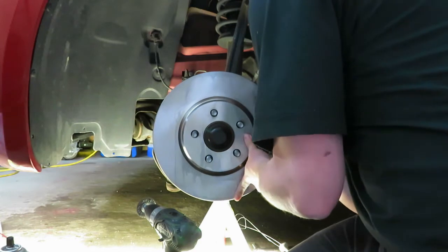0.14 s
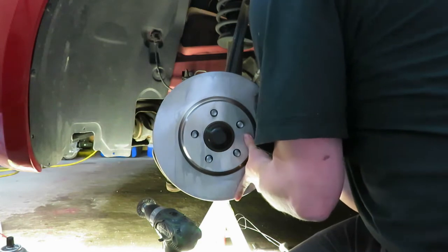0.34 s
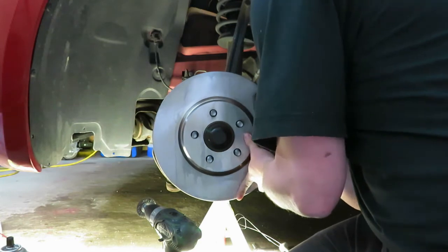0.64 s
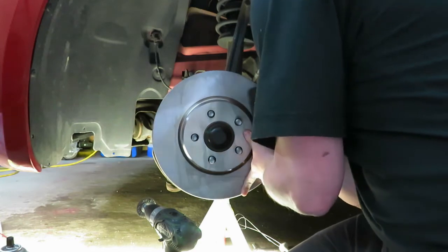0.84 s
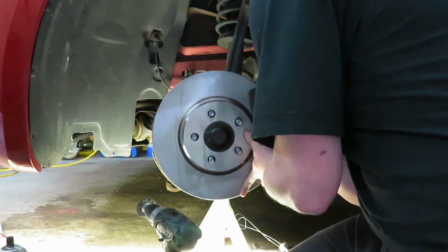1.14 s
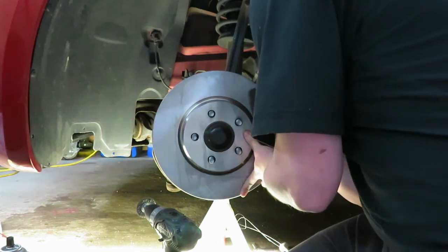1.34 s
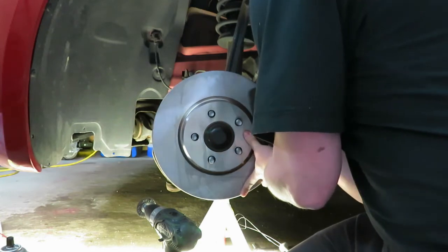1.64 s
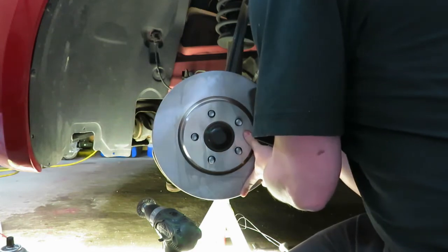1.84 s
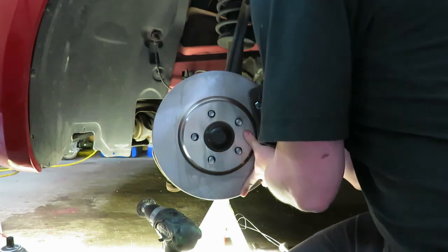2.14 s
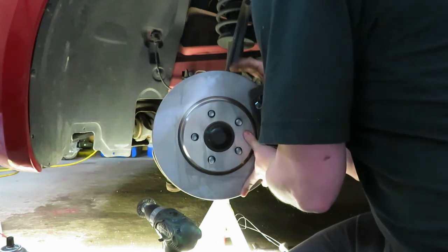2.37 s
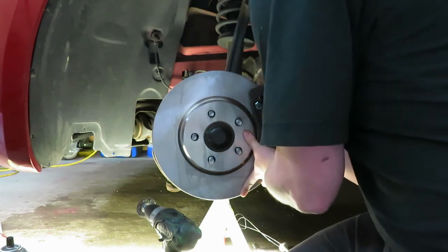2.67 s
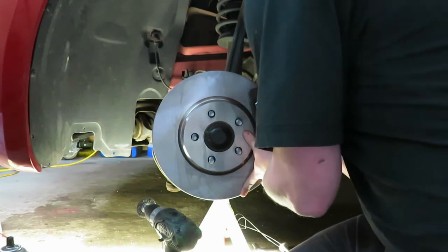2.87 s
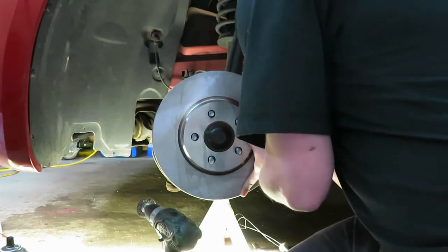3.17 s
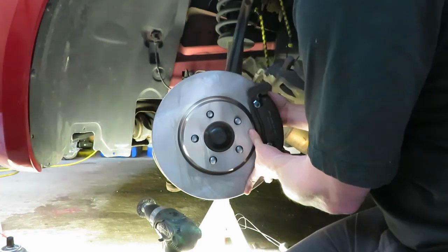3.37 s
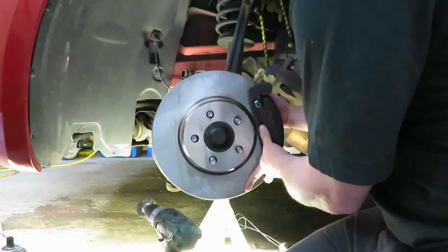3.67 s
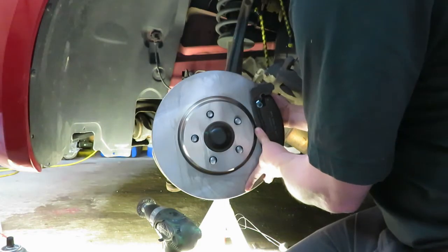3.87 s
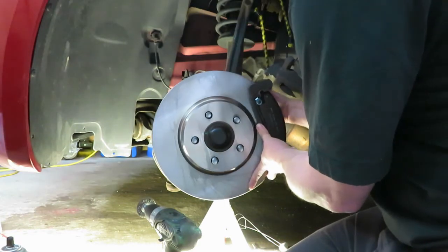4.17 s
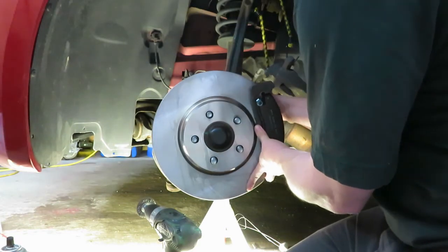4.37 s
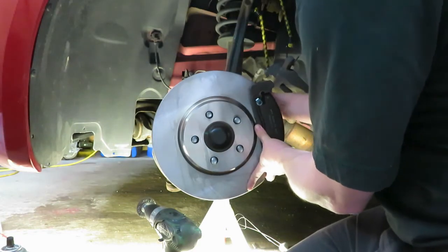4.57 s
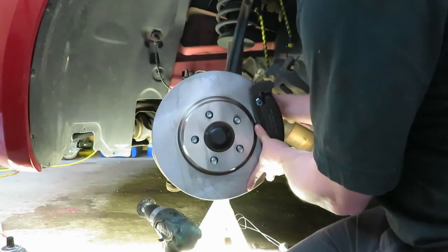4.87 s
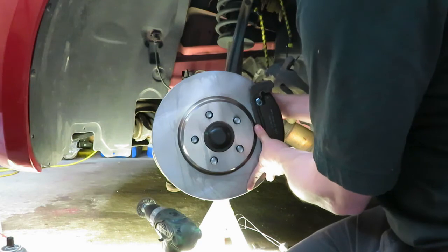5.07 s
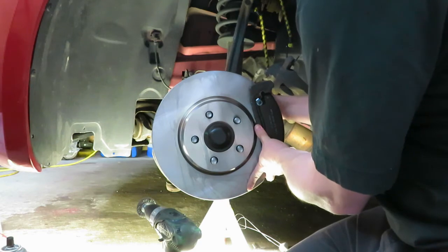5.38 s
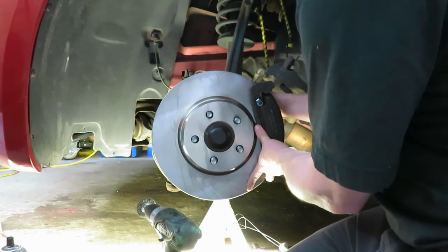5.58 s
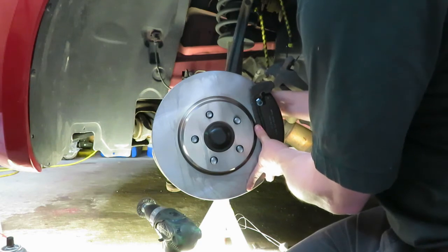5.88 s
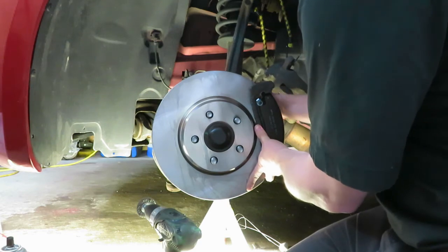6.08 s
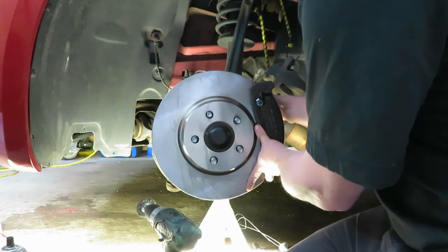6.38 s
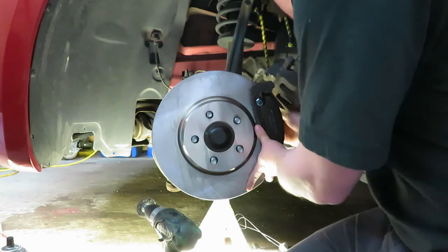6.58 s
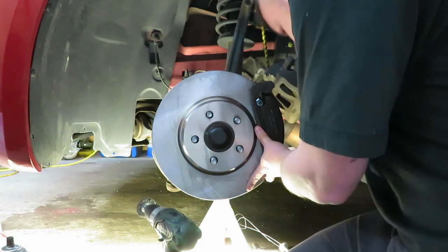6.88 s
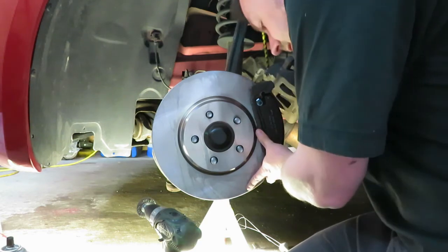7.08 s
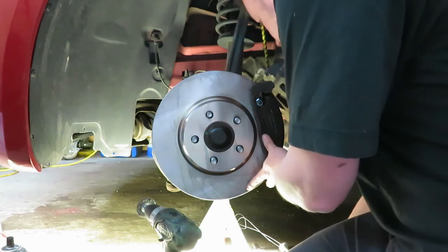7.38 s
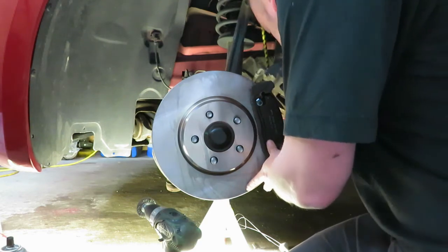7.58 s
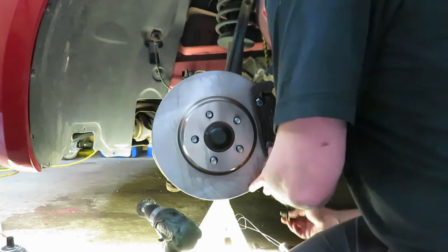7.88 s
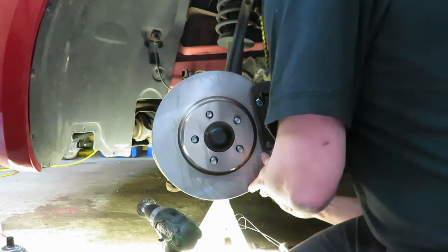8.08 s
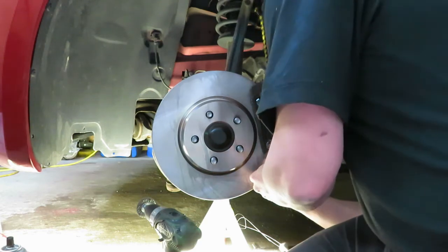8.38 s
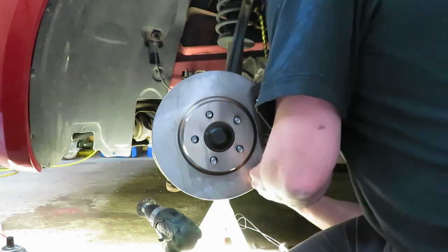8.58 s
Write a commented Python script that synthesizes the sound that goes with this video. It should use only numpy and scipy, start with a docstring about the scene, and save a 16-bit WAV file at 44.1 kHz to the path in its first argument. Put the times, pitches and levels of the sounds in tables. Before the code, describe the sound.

Close, stereo, lightly roomy garage sound: cast iron knocks on a car's hub and disc, with short ringing, heavy low thuds, tiny rattles and gritty scrapes. A distant engine booms in three low revs at first. After a brief gap of near silence, a cluster of clanks and knocks continues over hum, dying to soft touches, thin squeaks and a final rub of the disc.

```python
"""A cast-iron brake caliper bracket is worked into place over a brake disc in a garage.
Its clanks, thuds and rattles are decaying modes and noise bursts; its scrapes are wavering tones with gritty slips.
Shaped noise makes scuffs, thin squeaks, rustle and rumble. A distant engine, revved three times, is a firing
tone and its third order, with a separately wandering drone.
The sound drops out once, briefly, and the engine does not return; narrow noise bands leave a low hum."""
import sys
import numpy as np
from scipy import signal
from scipy.fft import rfft, irfft, next_fast_len
from scipy.io import wavfile
from scipy.ndimage import uniform_filter1d, minimum_filter1d, map_coordinates

SR = 44100
rng = np.random.default_rng(int(sys.argv[2]) if len(sys.argv) > 2 else 0)


def master_out(mix):
    """Clip the mix to full scale and print it as 16-bit PCM to the path in sys.argv[1]."""
    frames = np.transpose(np.atleast_2d(mix))
    ceiling = np.clip(frames, -1, 1)
    pcm = np.round(ceiling * 32767).astype(np.int16)
    wavfile.write(sys.argv[1], SR, pcm)


N = 384552
TIME = np.arange(N) / SR  # seconds into the scene
AGE = np.arange(int(SR * .55)) / SR  # seconds since a contact

# Blows of the bracket on the knuckle. Each row: start in seconds, clank level in dB, hardness as the top
# of the contact's treble in Hz, thud level in dB, mode favoured by the contact point in Hz,
# ring length as a factor (small when gripped), gain of the low clang in dB.
KNUCKLE_BLOWS = [(.001, -34.5, 4670, -68, 1345, 1.17, 5.5), (.185, -48, 2780, -47, 2008, 0.95, 5.5),
                 (.752, -26, 3100, -27.5, 3203, 1.1, 4), (.768, -21.5, 2930, -30.5, 786, 0.63, 6),
                 (.777, -21, 2580, -20.5, 1276, .8, 3.5), (.809, -28, 3200, -29, 2008, .65, 1.5),
                 (.826, -32.5, 2900, -43, 1744, 0.65, 4.5), (.845, -33.5, 3000, -33, 1276, 1, 5),
                 (.867, -34, 2800, -25.5, 895, 1.1, 8), (1.047, -35, 3010, -30.5, 2110, .5, -0.5),
                 (3.771, -51, 2300, -30.5, 895, 0.79, 8.5), (3.8, -43, 2300, -30, 895, .85, 14),
                 (3.878, -39, 2400, -29.5, 2000, 1.1, 6), (3.893, -47.5, 3000, -39.5, 895, .7, 12),
                 (4.046, -33.5, 3750, -35, 2191, .86, 0), (4.078, -34.5, 12000, -45, 2191, .7, -1.5),
                 (4.087, -15, 12000, -30, 1276, 0.9, -4.5), (4.268, -33, 1900, -34, 2000, 1, 13),
                 (4.38, -34, 2790, -43, 2708, 0.94, 4), (4.385, -26.5, 2800, -47, 1943, 0.61, 4),
                 (4.406, -28.5, 3100, -45, 2708, .85, 3.5), (4.413, -26.5, 3200, -44, 2573, 1.2, 2.5),
                 (4.607, -52, 3400, -47, 3203, 0.79, 8.5), (4.735, -54.5, 3400, -46.5, 3203, .8, 5),
                 (4.767, -31, 4480, -53, 2573, 1.6, 2.5), (4.886, -41, 4700, -39.5, 3327, 1, 1),
                 (4.924, -37.5, 3830, -42, 2008, 1.5, 11), (5.145, -22.5, 5200, -48.5, 3171, 1.09, -3),
                 (5.164, -34, 5950, -45, 1335, 1.2, 6.5), (5.422, -47, 2680, -43, 2008, 0.9, 4.5)]
# Blows of the bracket on the disc. Each row: the same columns, in the same units.
DISC_BLOWS = [(1.056, -41.5, 3010, -33, 1696, 1.4, 4.5), (2.149, -19, 3020, -33.5, 1157, 1.11, -1.5),
              (2.158, -29.5, 2800, -43, 818, 1.17, 5.5), (2.287, -48.5, 4400, -51, 2498, .9, -1),
              (2.461, -42.5, 2600, -29, 818, 0.75, 7), (2.521, -45, 2600, -35, 818, 1.06, 13),
              (2.68, -48.5, 3306, -49.5, 2000, 1.1, 3), (6.396, -60, 3680, -41.5, 1992, 0.64, 13.5),
              (6.941, -54, 3000, -42, 2498, 0.79, 14), (6.997, -53, 3000, -50, 2272, .5, 7),
              (7.141, -63, 3200, -47, 2272, .7, 18), (7.35, -53.5, 2800, -45, 1157, 0.73, 8.5),
              (7.555, -53, 2810, -52, 1335, .8, 8.5), (7.634, -64, 3000, -41, 2089, .7, 17)]
# Dense resonances of the iron assembly. Each row: frequency in Hz, relative spectral level in dB.
IRON_SPECTRUM = [(300, -29.5), (650, -8.5), (1000, -1.5), (1300, -7.5), (1550, -9), (1800, -2.5), (2050, 4),
                 (2400, -1.5), (3250, -7), (3650, -11.5), (4200, -30), (5200, -41), (7000, -70)]
# Spectrum of an edge's tick. Each row: frequency in Hz, relative spectral level in dB.
TICK_SPECTRUM = [(2500, -16), (4400, 2), (5300, -5.5), (6300, -6.5), (7300, -3), (8800, -6.5), (10500, -10),
                 (12000, -17.5), (15000, -41.5)]
# High ringing modes of the metal. Each row: frequency in Hz, relative level in dB, unscaled t60 in seconds.
HIGH_RING = [(3980, -3.5, .2), (4260, -2.5, 0.29), (4450, -4, 0.39), (4600, -3.5, 0.23), (4830, -4, 0.25),
             (5515, -8, 0.14), (5911, -5, .17), (6360, -5.5, 0.12), (7400, 1.5, .12), (7466, -1.5, 0.12),
             (7930, 0.5, .12), (8980, -2, .13), (10000, -5.5, .1), (11900, -9.5, .08)]
# The dropout: its start and its end in seconds.
DROPOUT_SPAN = (3.198, 3.372)


def blows(rows, modes, body, ring_db, favour_db):
    """Impact excitation: hardness sets the bandwidth, grip the damping, and weight drives the suspension."""
    # Suspension thud. Each row: frequency in Hz, relative spectral level in dB.
    thud_spectrum = [(70, -31), (140, -9), (280, 6), (450, -3), (700, -15.5), (1500, -44.5), (4000, -91.5)]
    # Suspension modes. Each row: frequency in Hz, relative level in dB, t60 in seconds.
    suspension_modes = [(135, -1, 0.28), (181.2, 2.5, 0.37), (219.6, -0.5, 0.47), (266.2, -2, .35),
                        (298, -6.5, 0.21), (364, -9, 0.38)]
    medium_hz, hardest_hz = 3360, 5200  # ordinary hardness; above hardest_hz only the tick gains
    sharp_db, edge_db = 3, 7  # gain per octave of hardness: upper modes, topmost modes
    snap, snap_s = .55, .01  # extra gain while the parts are pressed together, and its duration
    tick_db = -13.5  # relative to the clank, before the tick's treble roll-off
    thud_attack_s = .005  # the heavy suspension takes a moment to move
    out = np.zeros((2, N))
    for s, clank_db, top_hz, thud_db, favoured_hz, sustain, low_db in rows:
        tones = ring(modes, scatter_db=1.5, favoured_hz=favoured_hz, favour_db=favour_db, sustain=sustain)
        metal = burst(body, t60=.035, room_db=-7, room_t60=.32 * np.sqrt(abs(sustain)))
        metal = metal + amp(ring_db) * tones
        metal = metal * (1 + snap * np.exp(-(AGE / snap_s) ** 2))
        octaves = np.log2(min(top_hz, hardest_hz) / medium_hz)
        brightness = [(2100, 0), (2600, sharp_db * octaves), (3400, edge_db * octaves), (3900, -1.6)]
        metal = unit_attack(colour(metal, brightness))
        metal = colour(metal, [(1300, low_db), (1800, 0)])
        echo = amp(-25.0) * burst(body, t60=.2, room_db=-4.5, room_t60=.35)
        clank = spread(metal, echo) + amp(tick_db) * edge_tick(top_hz, sustain)
        add(out, s, amp(clank_db) * clank)
        thud = burst(thud_spectrum, t60=0.25, room_db=-1.5, room_t60=0.6)
        thud = thud + amp(5.5) * ring(suspension_modes, scatter_db=3.5)
        thud = thud * (1 - np.exp(-AGE / thud_attack_s))
        add(out, s, amp(thud_db) * unit_attack(thud))
    return out


def ring(modes, scatter_db, favoured_hz=0, favour_db=0, sustain=1):
    """Modal superposition: damped sinusoids, one favoured by the contact point, others varying by blow."""
    shift = 1.3  # pitch scatter in Hz for a t60 of 1 s; damped modes shift more
    hz, db, t60 = np.transpose(modes)[:, :, None]
    favour = favour_db * np.exp(-((hz - favoured_hz) / 35) ** 2)
    level = db + scatter_db * rng.standard_normal(hz.shape) + favour
    hz = hz + shift / t60 * rng.standard_normal(hz.shape)
    phase = 2 * np.pi * (hz * AGE + rng.random(hz.shape))
    decay = amp(level - 60 * AGE / (t60 * max(sustain, .1)))
    tones = decay * np.sin(phase.astype(np.float32))
    onset = 1 - np.exp(-(AGE / .0012) ** 2)
    contact = 1 + 0.25 * np.exp(-AGE / 0.048)  # touching parts drain the ring fast at first
    return unit_attack(onset * contact * np.sum(tones, 0))


def burst(spectrum, t60, room_db, room_t60):
    """High modal density: resonances merge into bunched noise, dying fast into the garage's slower decay."""
    cluster_hz, cluster_db = 55.2, 4.5  # spacing and depth of the uneven bunches
    envelope = np.hypot(amp(-60 * AGE / t60), amp(room_db - 60 * AGE / room_t60))
    envelope *= 1 - np.exp(-AGE / 0.0014)  # the contact takes a moment to build
    m = next_fast_len(len(AGE))
    hz = np.fft.rfftfreq(m, 1 / SR)
    knots = rng.standard_normal(size=1000)
    bunches = amp(cluster_db * np.interp(hz / cluster_hz, np.arange(len(knots)), knots))
    noise = irfft(rfft(rng.standard_normal(m)) * bunches, m)[:len(AGE)]
    return unit_attack(wheel_well(colour(envelope * noise, spectrum), gain=0.13))


def wheel_well(x, gain, count=7):
    """Comb filtering: close panels return a few copies within 12 ms."""
    out = x.copy()
    delays = rng.uniform(.001, .012, count)
    signs = rng.choice([-1, 1], count)
    for delay, sign in zip(delays, signs):
        add(out, delay, sign * gain * x)
    return out


def edge_tick(top_hz, sustain):
    """Contact stiffness: an edge snaps and rings briefly, duller and weaker when the contact is softer."""
    crack = amp(1.5) * burst(TICK_SPECTRUM, t60=0.016, room_db=-37.0, room_t60=.1)
    tail = burst(TICK_SPECTRUM, t60=0.035, room_db=-11.5, room_t60=0.22 * abs(sustain))
    tick = crack + tail + amp(-1.0) * ring(HIGH_RING, scatter_db=0.0, sustain=sustain)
    tick = spread(tick, amp(0.5) * burst(TICK_SPECTRUM, t60=.035, room_db=-10.0, room_t60=0.2))
    treble = [(4400, 0.83), (7000, 12.5), (12000, 15), (14000, 11)]
    tilt = [(hz, db + roll_off(hz, top_hz)) for hz, db in treble]
    return amp(tilt[0][1]) * unit_attack(colour(tick, tilt))


def roll_off(hz, top_hz):
    """Low-pass action of a contact: its response in decibels at hz for the given hardness."""
    order = 7.2  # steepness
    return -10 * np.log10(1 + (hz / top_hz) ** (2 * order))


def rattles():
    """Repeated impact: the loose bracket chatters on its seat in tiny, irregularly spaced contacts."""
    # Each row: start in seconds, length in seconds, first and last contact level in dB, hardness in Hz.
    rattle_rows = [(.785, .13, -35, -50.5, 2800), (2.204, .08, -51, -56.5, 3400),
                   (2.452, .3, -54.5, -56, 2600), (4.451, .19, -52, -59.5, 3600),
                   (4.891, 0.13, -42.5, -58, 3750), (5.181, .18, -39.5, -64, 5200),
                   (6.901, .75, -61.5, -57, 2610)]
    # Chatter spectrum. Each row: frequency in Hz, relative spectral level in dB.
    chatter_spectrum = [(400, -14), (900, 2), (1600, 0.5), (2100, 4.5), (3200, 7.5), (4500, 1),
                        (7500, -6.5), (12000, -20)]
    gap_s, scatter_db = .021, 2.5  # mean time between contacts, spread of their strength
    out = np.zeros((2, N))
    age = AGE[:SR // 10]
    decay = np.hypot(amp(-60 * age / .014), amp(-14 - 60 * age / .16))
    for s, length, first_db, last_db, top_hz in rattle_rows:
        contacts = np.zeros((2, int(length * SR) + len(age)))
        times = np.cumsum(gap_s * rng.gamma(2, .5, size=80))
        for at, strength in zip(times, rng.standard_normal(size=80)):
            if at < length:
                db = first_db + (last_db - first_db) * at / length + scatter_db * strength
                grain = decay * rng.standard_normal((2, len(age)))
                add(contacts, at, amp(db) * unit_attack(grain, size=400))
        mid, side = colour(colour(contacts, chatter_spectrum), [(top_hz, 0), (2 * top_hz, -32)])
        add(out, s, spread(mid, amp(-7.5) * side))
    return out


def scrapes():
    """Stick-slip friction: sliding iron judders near its strongest modes; tiny slips ring the high ones."""
    # Each row: start in seconds, length in seconds, judder level in dB, grit level in dB,
    # judder pitch in Hz, low mode in dB relative to the judder's squeal.
    scrape_rows = [(.004, 0.019, -52, -56, 2080, -10), (0.736, 0.018, -35.5, -60, 2110, -14),
                   (0.748, 0.013, -21.5, -43.5, 2010, -12), (0.764, 0.014, -10, -54, 2006, -18),
                   (.806, 0.0098, -26.5, -54, 2035, -19), (0.82, .032, -36, -56, 2100, -6),
                   (0.849, .016, -39, -48.5, 2220, -8), (0.863, .016, -30, -66, 2050, -20),
                   (3.761, 0.1, -34, -92, 2010, -8.5), (4.036, 0.063, -19.5, -63.5, 2006, -7),
                   (4.084, 0.014, -11.5, -30.5, 1973, -20), (4.888, 0.087, -40.5, -87, 2030, -7),
                   (8.595, .04, -60.5, -80, 1990, -10)]
    # Slips of a sliding edge. Each row: frequency in Hz, relative spectral level in dB.
    grit_spectrum = [(2500, -18), (4400, -7.5), (5500, -4), (7400, 1), (10500, -6), (12000, -11),
                     (15000, -36.5)]
    drift, flutter_db = .009, 1.4  # unsteadiness of the judder's pitch (fraction) and level
    out = np.zeros((2, N))
    for s, length, judder_db, grit_db, hz, low_db in scrape_rows:
        press = stroke(length)
        n = len(press)
        phase = 2 * np.pi * np.cumsum(hz * (1 + drift * wobble(130, size=n))) / SR
        judder = np.sqrt(2) * amp(flutter_db * wobble(220, size=n)) * np.sin(phase)
        bands = [(2210, 70, -11.5), (2970, 70, -20.5), (3190, 70, -20.5), (895, 35, low_db)]
        for mode_hz, width_hz, db in bands:
            judder = judder + amp(db) * narrow(mode_hz, width_hz, n)
        judder = judder + amp(-11.5) * unit(colour(rng.standard_normal(n), IRON_SPECTRUM))
        add(out, s, amp(judder_db) * press * unit(judder))
        slips = press * rng.standard_normal((2, n)) ** 3  # cubing leaves sparse, spiky slips
        edge = burst(grit_spectrum, t60=0.022, room_db=-18.0, room_t60=0.12)
        edge = edge + amp(-9.5) * ring(HIGH_RING, scatter_db=0.0, sustain=0.89)
        grit = unit_attack(signal.fftconvolve(slips, edge[None], axes=1), size=n)
        add(out, s, amp(grit_db) * spread(grit[0], amp(-5.5) * grit[1]))
    return out


def stroke(length):
    """Contact pressure as a window: it rises, holds and falls over a short sliding movement."""
    return signal.windows.tukey(max(16, int(length * SR)), .5)


def scuffs():
    """Granular friction: cloth, skin and the bracket sliding on after each blow catch on rough iron."""
    # Hand and sleeve brush the parts. Each row: start in seconds, length in seconds, level in dB.
    scuff_rows = [(0.543, 0.2, -55), (3.066, 0.16, -54), (3.528, 0.087, -64), (4.519, 0.14, -53),
                  (4.861, 0.15, -46), (6.486, 0.089, -56.5), (8.577, .16, -48.5)]
    # Brushing noise. Each row: frequency in Hz, relative spectral level in dB.
    brush_spectrum = [(120, -44.5), (400, -7), (1000, 6), (1600, 3), (2300, 4.5), (3400, -3), (4400, -12.5),
                      (5500, -29), (7000, -41.5), (12000, -50)]
    delay_s, slide_s, slide_db = 0.0201, .14, -52  # slide after a blow: start, length, level at firm_db
    firm_db, force, grip = -17.5, 0.68, 0.25  # firm clank; dB gained per dB of clank, lost per dB of grip
    strokes = list(scuff_rows)
    for s, clank_db, _, thud_db, *_ in KNUCKLE_BLOWS + DISC_BLOWS:
        db = slide_db + force * (clank_db - firm_db) - grip * (thud_db - clank_db)
        strokes.append((s + delay_s, slide_s, db))
    power = np.zeros(N)
    for s, length, db in strokes:
        add(power, s, (amp(db) * stroke(length)) ** 2)
    noise = rng.standard_normal((2, N)) * amp(2.2 * wobble(120))
    grains = unit(colour(noise, brush_spectrum))
    return np.sqrt(power) * spread(grains[0], amp(-10.5) * grains[1])


def squeaks():
    """Friction-excited resonance: light rubbing draws thin tones from the metal and makes the disc sing."""
    # Thin high squeaks. Each row: start in seconds, length in seconds, level in dB.
    squeak_rows = [(7.558, 0.044, -72.5), (7.667, 0.03, -72), (7.732, 0.049, -65.5)]
    # The disc sings under a light rub: start in seconds, length in seconds, level in dB.
    disc_rub = (8.57, 0.141, -43.5)
    # Tones of the rubbed disc. Each row: frequency in Hz, relative level in dB.
    rub_tones = [(802, 1.5), (1071, 2), (2573, -7), (2966, -14), (3521, -5.5), (3661, -15)]
    out = np.zeros(N)
    for s, length, db in squeak_rows:
        press = stroke(length)
        add(out, s, amp(db) * press * narrow(13000, 250, len(press)))
    s, length, db = disc_rub
    press = stroke(length)
    song = sum(amp(level) * narrow(hz, 34, len(press)) for hz, level in rub_tones)
    add(out, s, amp(db) * press * unit(song))
    return out


def engine():
    """Transmission through walls passes only low tones: firing, its third order, a separately wandering drone."""
    # Firing. Each row: time in seconds, firing rate in Hz, level in dB.
    firing_curve = [(0, 50.7, -29), (.12, 50.7, -26.5), (.25, 42.7, -24), (.42, 44.1, -22.5),
                    (.6, 41.26, -27.5), (.78, 35.69, -34.5), (.95, 43, -33), (1.32, 44.35, -33),
                    (1.45, 47.5, -20), (1.88, 50, -17), (2.02, 50.84, -30.5), (2.18, 51.95, -21),
                    (2.33, 51.6, -22.5), (2.43, 49.54, -35), (2.7, 51.05, -39), (2.85, 51.5, -42)]
    # A drone wanders near twice the firing rate. Each row: time in seconds, pitch in Hz, level in dB.
    drone_curve = [(0, 90.2, -36), (.3, 97.2, -29.5), (.42, 92.3, -25.5), (.6, 86.6, -28.5),
                   (.72, 80.5, -33), (.9, 92, -46), (1.4, 94.9, -47), (1.6, 95.9, -33.5), (1.9, 85.6, -27),
                   (2.15, 95.5, -26.5), (2.4, 93.7, -31), (2.8, 92.87, -29.5), (2.88, 94.64, -38),
                   (3.15, 80.1, -38)]
    idle_db = -34  # level between revs
    third_db, third_grows = -41.5, 0.42  # third order at idle; dB it gains per dB of the firing tone
    rate_hz, level_db = curves(firing_curve)
    drone_hz, drone_db = curves(drone_curve)
    phase = 2 * np.pi * np.cumsum(rate_hz) / SR
    firing = amp(level_db + 1.1 * wobble(15)) * np.sin(phase + 0.096 * wobble(43))
    drone_phase = 2 * np.pi * np.cumsum(drone_hz) / SR
    drone = amp(drone_db + 2.2 * wobble(22)) * np.sin(drone_phase + 0.74 * wobble(30))
    third_level = third_db + third_grows * (level_db - idle_db) + 3.2 * wobble(20)
    third = amp(third_level) * np.sin(3 * phase + 0.42 * wobble(24))
    return np.sqrt(2) * (firing + drone + third) * (TIME < DROPOUT_SPAN[0])


def garage():
    """Room resonance: narrow bands of machine hum waver over broadband rumble and a soft rustle of clothing."""
    # Hum lines. Each row: frequency in Hz, width in Hz, level in dB before the room's hum gain.
    hum_lines = [(53.7, 14, -43.5), (68, 9, -41), (99.93, 4.9, -37), (143, 20, -50), (221, 20, -50.5),
                 (314.9, 9, -47.5)]
    # Rumble. Each row: frequency in Hz, relative spectral level in dB.
    rumble_spectrum = [(20, -16.5), (45, 4), (130, 5.5), (200, 1), (300, -2.5), (380, -6.5), (600, -13.5),
                       (900, -14.5), (1600, -41), (3000, -82.5)]
    # Rustle. Each row: frequency in Hz, relative spectral level in dB.
    rustle_spectrum = [(90, -49), (300, 3), (800, -5.5), (1300, -4.5), (1550, -8), (2100, -11),
                       (3000, -19.5), (3700, -28), (4500, -41), (6000, -50.5), (15000, -61)]
    # Room levels. Each row: time in seconds, hum gain in dB, rumble level in dB.
    room_curve = [(0, -7, -35), (1.25, -6.5, -39), (1.9, -3, -33), (2.6, -6, -32.5), (3, -6, -37),
                  (3.55, 4.5, -36), (4.3, -0.5, -40.5), (5.2, 3.5, -35.5), (6.4, 3, -37),
                  (8.72, -3.5, -38.5)]
    # Clothing. Each row: time in seconds, mean rustle level in dB.
    movement_curve = [(0, -45), (.75, -47.5), (1.2, -51), (1.8, -43), (2.6, -44.5), (2.9, -49.5),
                      (3.55, -48), (4.3, -53), (5.4, -46.5), (6, -50.5), (6.7, -49), (7.3, -46.5),
                      (7.8, -50.5), (8.72, -49.5)]
    hum_db, rumble_db = curves(room_curve)
    hum = amp(hum_db) * sum(amp(db) * narrow(hz, width, N) for hz, width, db in hum_lines)
    rumble = amp(rumble_db) * unit(colour(rng.standard_normal(N), rumble_spectrum))
    rustle_db, = curves(movement_curve)
    rustle = unit(colour(rng.standard_normal((2, N)), rustle_spectrum))
    rustle = amp(rustle_db + 1.9 * wobble(11)) * rustle
    rustle = rustle * amp(1.1 * wobble(45))  # clothing makes the rustle uneven
    return spread(hum + rumble + rustle[0], amp(-8.0) * rustle[1])


def hiss():
    """Exponentially decaying noise: a brief hiss as the sound returns."""
    out = np.zeros((2, N))
    noise = unit(colour(rng.standard_normal(len(AGE)), TICK_SPECTRUM))
    add(out, DROPOUT_SPAN[1], amp(-60.5 - 60 * AGE / 0.4) * noise)
    return out


def amp(db):
    """Logarithmic level: decibels to amplitude gain."""
    return np.exp(np.asarray(db) * (np.log(10) / 20))


def unit(x):
    """Mean-square normalisation: scale to rms 1."""
    return x / np.sqrt(np.mean(x ** 2) + 1e-20)


def unit_attack(x, size=1300):
    """Mean-square normalisation of the attack: the first size samples get rms 1."""
    return x / np.sqrt(np.mean(x[..., :size] ** 2) + 1e-20)


def curves(rows):
    """Linear interpolation: one value per sample for each column after the time."""
    s, *cols = np.transpose(rows)
    return [np.interp(TIME, s, c) for c in cols]


def wobble(rate, size=N):
    """Band-limited fluctuation: a smooth random curve with rate knots a second."""
    knots = rng.standard_normal(int(size * rate / SR) + 4)
    return map_coordinates(knots, [TIME[:size] * rate])


def colour(x, points):
    """Minimum-phase filtering: a causal response through (Hz, dB) points, by way of the cepstrum."""
    n = x.shape[-1]
    m = 2 * next_fast_len(n // 2 + 2048)
    hz, db = np.transpose(points)
    log_hz = np.log(np.fft.rfftfreq(m, 1 / SR) + 1)
    cepstrum = irfft(np.log(amp(np.interp(log_hz, np.log(hz), db))))
    cepstrum[1:m // 2] *= 2  # fold onto positive times
    cepstrum[m // 2 + 1:] = 0
    return irfft(rfft(x, m) * np.exp(rfft(cepstrum)), m)[..., :n]


def narrow(hz, width_hz, n):
    """Narrow-band noise: a resonance-shaped band is heard as a fuzzy, wavering tone."""
    f = np.fft.rfftfreq(next_fast_len(n + SR // 4), 1 / SR)
    noise = rfft(rng.standard_normal(2 * len(f) - 2))
    return unit(irfft(noise / (1 + ((f - hz) / width_hz * 2) ** 2))[:n])


def add(track, s, x):
    """Linear superposition: mix x into track at s seconds."""
    start = max(0, round(s * SR))
    track[..., start:start + x.shape[-1]] += x[..., :track.shape[-1] - start]


def spread(mid, side):
    """Sum-and-difference stereo: left and right from mid and side."""
    return np.array([mid + side, mid - side])


def scene():
    """Superposition of all sources, with the work straight ahead of the microphones."""
    # Bracket modes. Each row: frequency in Hz, relative level in dB, unscaled t60 in seconds.
    bracket_modes = [(796, -18.5, .4), (895, -15.5, .8), (1222, -16.5, 0.58), (1278, -13, .55),
                     (1337, -15, 0.48), (1435, -14.5, 0.59), (1744, -12, .3), (1955, -3, .18),
                     (2000, 1, 0.23), (2083, -9, .25), (2200, -12, .28), (2299, -12, .3),
                     (2433, -6.5, 0.27), (2567, -7, .16), (2700, -6, 0.21), (2860, -10, 0.19),
                     (2894, -10, 0.25), (3150, -13.5, 0.24), (3210, -9.5, 0.17), (3310, -13.5, 0.26),
                     (3510, -15.5, .15), (3600, -14.5, .18)]
    # Disc modes. Each row: frequency in Hz, relative level in dB, unscaled t60 in seconds.
    disc_modes = [(828, -0.5, .2), (1150, -4.5, 0.22), (1350, -22, .5), (1695, -3.5, .25), (1992, -0.5, .2),
                  (2072, 0, .16), (2280, -6.5, .2), (2320, -2.5, 0.13), (2510, -6.5, .2), (3760, -16, .18)]
    # Dense resonances of the disc. Each row: frequency in Hz, relative spectral level in dB.
    disc_spectrum = [(300, -35), (600, -14.5), (850, -7.5), (1400, -10.5), (1800, -4.5), (2100, 4),
                     (2500, -10), (3100, -17), (3800, -25), (4800, -30.5), (7000, -72)]
    knuckle = blows(KNUCKLE_BLOWS, bracket_modes, IRON_SPECTRUM, ring_db=3.5, favour_db=10.5)
    disc = blows(DISC_BLOWS, disc_modes, disc_spectrum, ring_db=4.0, favour_db=6.5)
    work = knuckle + disc + rattles() + scrapes() + scuffs() + squeaks()
    return work + engine() + garage() + hiss()


def record(dry):
    """Gain control and band limiting: one dropout, a limiter on the loudest peaks, then a steep low-pass."""
    limit, hold_s, top_hz = 0.96, .004, 15400  # peak ceiling, time the gain is held down, band limit
    silent = (TIME > DROPOUT_SPAN[0]) & (TIME < DROPOUT_SPAN[1])
    x = dry * uniform_filter1d(np.where(silent, amp(-54.5), 1.), size=90)
    hold = max(8, int(hold_s * SR))
    needed = limit / np.maximum(np.abs(x).max(0), limit)
    x = x * uniform_filter1d(minimum_filter1d(needed, hold), hold)
    m = next_fast_len(N + SR // 4)
    passed = np.fft.rfftfreq(m, 1 / SR) < top_hz
    return irfft(rfft(x, m) * passed, m)[:, :N]


dry = scene()
out = record(dry)
master_out(out)
```